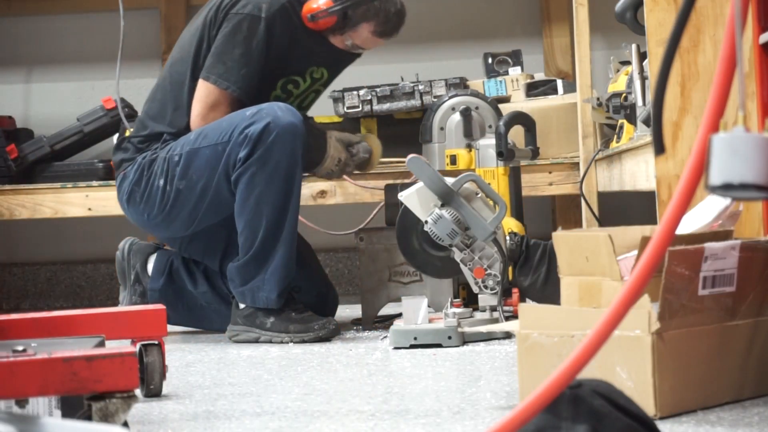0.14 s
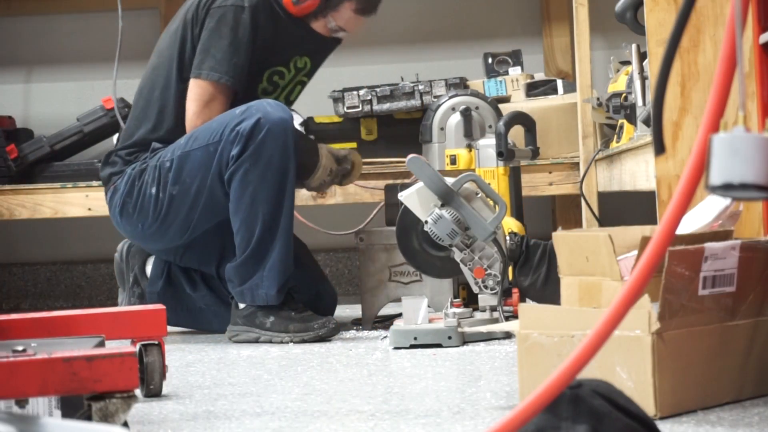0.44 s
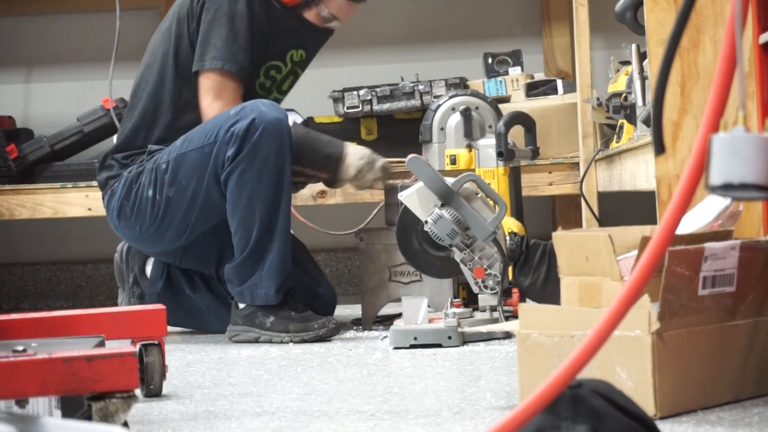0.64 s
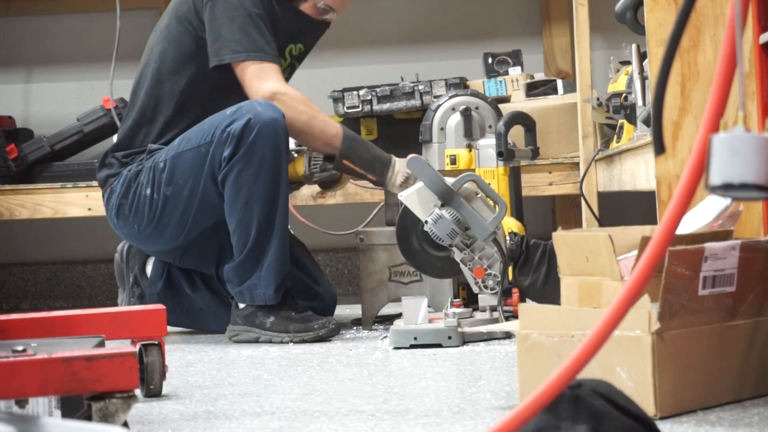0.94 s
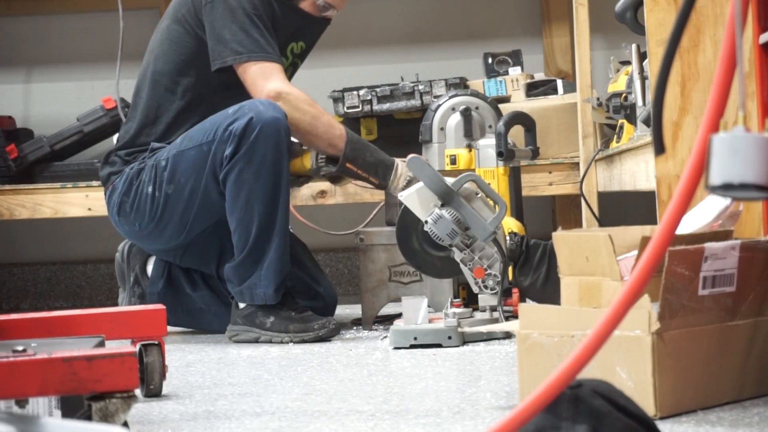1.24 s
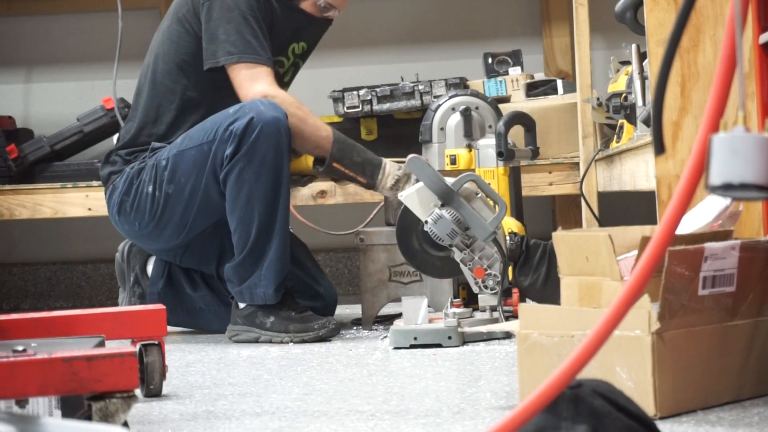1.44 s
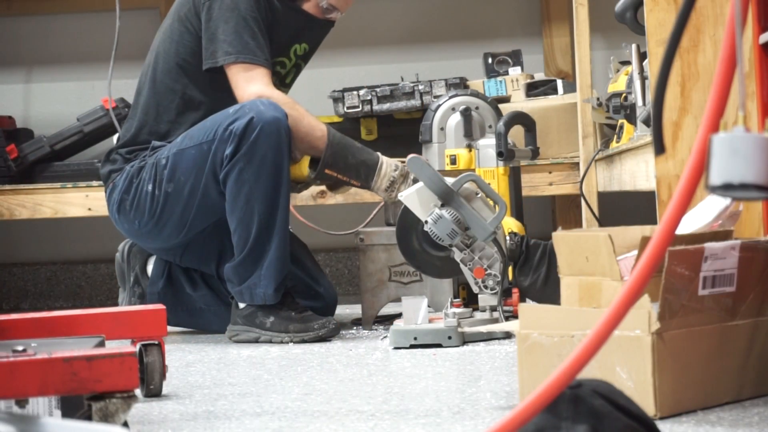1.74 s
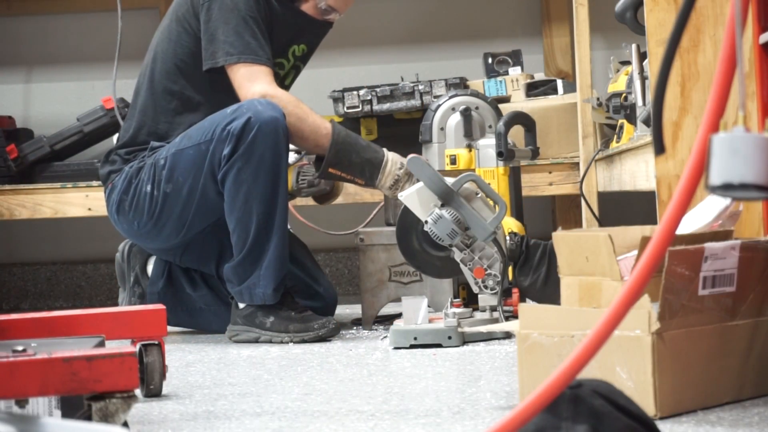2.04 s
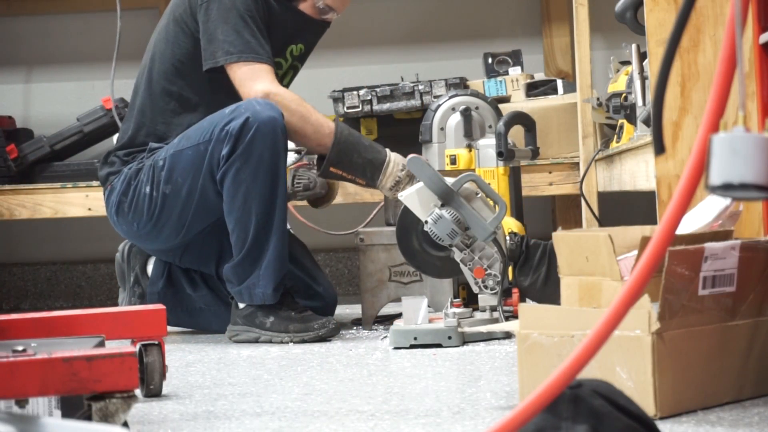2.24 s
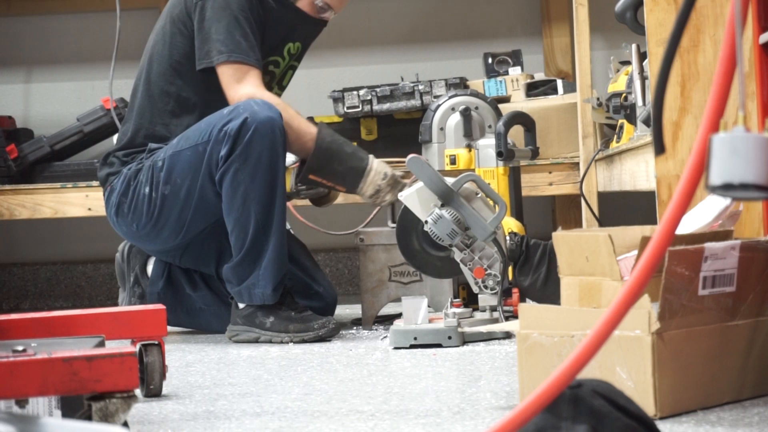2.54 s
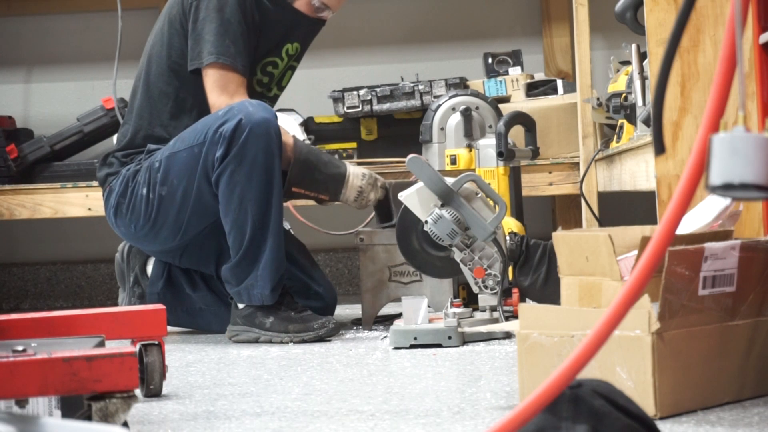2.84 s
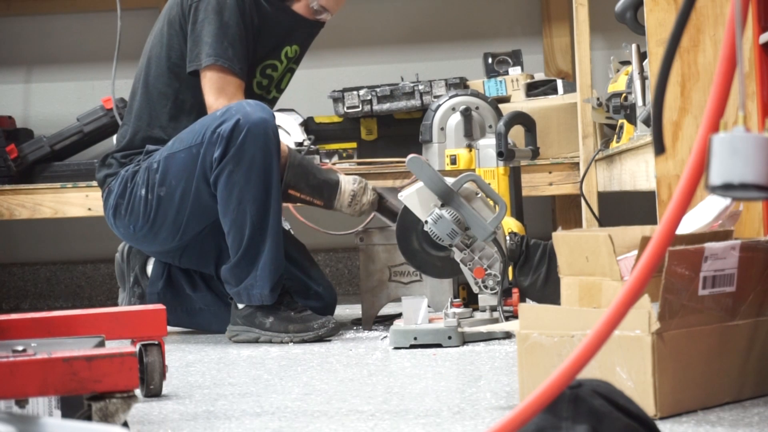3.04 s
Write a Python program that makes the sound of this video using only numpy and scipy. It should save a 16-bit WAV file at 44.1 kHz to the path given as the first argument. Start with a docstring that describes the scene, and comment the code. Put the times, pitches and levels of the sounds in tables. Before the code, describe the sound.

Chop saw coasting after power-off, its rushing motor and gear noise steadily fading as a faint hum drops in pitch; thin gritty scrapes and sharp ticks echo in the garage, caught by a small stereo camera microphone.

```python
"""Chop saw coasting down in a garage

The roar of a saw's motor, fan and gears gets softer and duller: shaped noise slides between two tone colours.
The armature whine is one sinking sine wave. A steel piece held lightly against the abrasive wheel scrapes in
uneven bursts: grit noise and sudden catches ring its modes, and a garage echo follows. A faint low rumble and
soft knocks on the floor lie underneath. All is heard in stereo through a small camera microphone."""
import sys
import numpy as np
from scipy import signal
from scipy.fft import rfft, irfft, next_fast_len
from scipy.io import wavfile
from scipy.ndimage import uniform_filter1d, map_coordinates

SR = 44100
rng = np.random.default_rng(int(sys.argv[2]) if len(sys.argv) > 2 else 0)


def undo_db(level):
    """Turn decibels back into plain size, where 20 dB means ten times bigger."""
    steps = np.asarray(level, float) / 20
    return 10 ** steps


def log_audio(samples):
    """Write samples as a 16-bit WAV file to the path given in sys.argv[1]."""
    # one column per channel
    frames = np.atleast_2d(samples).T
    # limit to full scale, then quantise
    limited = np.clip(frames, -1, 1)
    pcm = np.round(limited * 32767).astype(np.int16)
    wavfile.write(sys.argv[1], SR, pcm)


N = 141120
SECONDS = np.arange(N) / SR

# The saw slowing down. Each row: time in seconds, armature speed in Hz, whine level in dB before its flutter.
SPIN = [(0, 519, -70), (.4, 518.4, -57), (.7, 463, -56), (.85, 440, -51.5), (1.09, 412, -49),
        (1.5, 361.4, -49.5), (1.67, 346, -50.5), (1.74, 336.5, -69), (1.82, 334, -70), (1.9, 319.5, -60),
        (2.0, 315, -66), (2.1, 301, -75), (2.33, 282.4, -69.5), (2.45, 263, -79), (3.2, 205, -76)]
# Loudness of the roar. Each row: time in seconds, level in dB before roar() adds its gain.
ROAR_LEVEL = [(0.0, -26), (1.85, -33), (1.94, -32), (1.97, -34), (3.08, -38), (3.15, -36), (3.2, -34.5)]
# Tone colour of the roar at high speed. Each row: frequency in Hz, relative strength in dB per Hz.
FAST_COLOUR = [(76, -81), (156, -63), (186, -51.5), (391, -24.5), (508, -21.5), (608, -24), (1000, -8.5),
               (1350, -10), (2470, -4.5), (4000, -4), (7000, -9.5), (11600, -6.5), (15600, -12)]
# Tone colour of the roar at low speed. Each row: frequency in Hz, relative strength in dB per Hz.
SLOW_COLOUR = [(76, -65), (130, -43), (469, -11), (518, -11.5), (889, -9), (1020, -4), (1330, -8),
               (1440, -6), (3140, -0.5), (3760, -9), (4330, -3), (4780, -5), (7000, -10), (12000, -12.5),
               (15600, -15.5)]
# Resonances of guard and housing. Each row: frequency in Hz, width in Hz, boost in dB.
HOUSING = [(528.5, 29, 6.5), (645, 66, 6.5), (809, 43, 6.5), (1000, 160, 3), (1345, 71, -3),
           (1694, 124, 3.5), (2490, 69, 4), (3900, 420, 4), (3560, 510, 0.5), (5610, 480, 4)]
# How alike the roar is left and right. Each row: frequency in Hz, likeness (1 means the same).
ALIKE = [(30, .3), (90, 1), (200, 0.97), (400, 0.96), (700, 0.81), (1500, 0.59), (3000, 0.51), (6000, 0.16),
         (12000, 0.17)]
# The piece touching the wheel. Each row: time in seconds, relative contact pressure in dB,
# long ring of the whole piece against its thin edge in dB.
CONTACT = [(0.0, -38, -6), (0.05, -32.5, 2), (0.76, -35, -3.5), (0.8, -24.5, -2), (0.92, -33.5, -0.5),
           (1.23, -34, 1), (1.26, -26, 0.5), (1.32, -37, -6), (1.4, -29, -1.5), (1.54, -37, 1.5),
           (1.58, -29, 2), (1.59, -35.5, 1), (1.86, -37.5, -2), (1.88, -31.5, 3), (2.05, -31.5, -4),
           (2.16, -39, -4), (2.19, -39, 8), (2.22, -30, 2), (2.3, -39, 1), (2.38, -34, 0.5),
           (2.39, -31, -10), (2.41, -38, 0), (2.47, -48, -1), (2.49, -34, -1), (2.51, -38, 10),
           (2.55, -44, 5), (2.57, -30, -1), (2.61, -47, -7), (2.65, -34, 5.5), (2.77, -41, 4),
           (3.07, -40.5, 9), (3.14, -31.5, 4), (3.2, -32, 0)]
# The wheel catching the piece. Each row: time in seconds, relative strength in dB.
CATCHES = [(1.2323, -25), (1.3819, -26), (1.569, -21), (2.011, -25), (2.211, -31), (2.3345, -26),
           (2.3597, -27), (2.3805, -18), (2.4884, -21), (2.5575, -25.5), (2.6355, -33), (2.8052, -36),
           (3.127, -20), (3.1594, -32)]
# Modes of the thin edge. Each row: frequency in Hz, width in Hz, relative level in dB.
EDGE_MODES = [(11040, 480, -11.5), (11430, 250, 1), (11700, 560, 0.5), (12500, 200, -2.5),
              (12900, 400, -5.5)]
# Modes of the whole piece once the ring has climbed. Each row: frequency in Hz, width in Hz, relative level in dB.
BODY_MODES = [(2380, 1350, -15.5), (2870, 310, -10), (3225, 52, -9.5), (3720, 90, -8), (4194, 55, -1),
              (4286, 50, -2), (4316, 60, -1), (4534, 196, -7.5), (6270, 260, -16.5)]
# How long the garage rings. Each row: frequency in Hz, time to fall by 60 dB in seconds.
GARAGE_DECAY = [(300, 0.93), (4000, 1), (12000, 0.22)]
# Tone colour of the rumble. Each row: frequency in Hz, relative strength in dB per Hz.
RUMBLE_COLOUR = [(20, -5), (60, 5.5), (120, 6.5), (200, 14), (300, -23), (500, -60)]
# Soft knocks on the floor. Each row: start in seconds, level in dB, pitch in Hz, time to fall by 60 dB in seconds.
KNOCKS = [(.15, -73, 96, 0.33), (2.36, -66.5, 97.4, 0.84), (2.9, -62, 232, 0.86), (3.04, -63, 176, .4),
          (3.14, -62, 170.5, 0.43)]
# Balance of the two microphone ports. Each row: frequency in Hz, left over right in dB.
LEFT_OVER_RIGHT = [(30, 0), (200, 2.1), (1000, 0), (4000, 0.25), (12000, 1)]


def unit(x):
    """Scales a sound to an rms of 1."""
    return x / np.sqrt(np.mean(x ** 2) + 1e-20)


def along(points, hz):
    """Reads a curve of (Hz, value) points on a logarithmic frequency axis."""
    f, value = np.transpose(points)
    return np.interp(np.log(hz + 1), np.log(f + 1), value)


def curves(rows):
    """Turns each column after the time into one value per sample."""
    s, *columns = np.transpose(rows)
    return [np.interp(SECONDS, s, column) for column in columns]


def wobble(rate):
    """A smooth random curve through this many random points a second."""
    points = rng.standard_normal(int(N * rate / SR) + 4)
    return map_coordinates(points, [np.arange(N) * rate / SR])


def filtered(x, response):
    """Multiplies the spectrum of x by a response, given as a function of frequency."""
    m = next_fast_len(N + SR // 2)
    return irfft(rfft(x, m) * response(np.fft.rfftfreq(m, 1 / SR)), m)[..., :N]


def modes(table):
    """Response of a ringing body: a sum of resonances with alternating sign."""
    def response(f):
        total = 0
        for k, (centre, width, db) in enumerate(table):
            resonance = 1j * f * width / (centre ** 2 - f ** 2 + 1j * f * width)
            total = total + (-1) ** k * undo_db(db) * resonance
        return total
    return response


def roar():
    """Fan and gear noise through the housing and the room's standing waves; it dulls as the speed drops."""
    patchy_db, ripple_db, ripple_hz = 1.0, 1.6, 25
    fast_hz, slow_hz = 508, 213  # armature speeds of the two tone colours
    speed_hz, level_db = curves(SPIN)[0], curves(ROAR_LEVEL)[0]

    # Noise with patches of slightly uneven strength in time and frequency
    cells = signal.stft(rng.standard_normal((2, N)), nperseg=512)[2]
    patches = uniform_filter1d(rng.standard_normal(cells.shape[1:]), 6, 0)
    patches = uniform_filter1d(patches, 14, 1)
    noise = signal.istft(cells * undo_db(patchy_db * unit(patches)), nperseg=512)[1][:, :N]

    def housing(f):
        return undo_db(sum(db / (1 + (2 * (f - c) / w) ** 2) for c, w, db in HOUSING))

    def mid_side(f):
        # This angle shares the noise so that left and right are as alike as the table asks
        angle = np.arccos(np.clip(along(ALIKE, f), -1, 1)) / 2
        return housing(f) * [np.cos(angle), np.sin(angle)]

    mid, side = filtered(noise, mid_side)
    stereo = np.array([mid + side, mid - side])

    # Each colour has its own fine ripples from the standing waves
    knots = rng.standard_normal((2, SR))

    def coloured(colour, k):
        def response(f):
            ripple = ripple_db * map_coordinates(knots[k], [f / ripple_hz])
            return undo_db(along(colour, f) + ripple)
        return unit(filtered(stereo, response))

    fast, slow = coloured(FAST_COLOUR, 0), coloured(SLOW_COLOUR, 1)
    share = np.clip(np.log(speed_hz / slow_hz) / np.log(fast_hz / slow_hz), 0, 1)
    gain = undo_db(level_db + 6 + 0.067 * wobble(6.8))
    return gain * (share * fast + (1 - share) * slow)


def whine():
    """The unbalanced armature hums once a turn, slightly unsteady in pitch and level."""
    speed_hz, level_db = curves(SPIN)
    phase = 2 * np.pi * np.cumsum(speed_hz) / SR + 0.44 * wobble(30.9)
    return np.sqrt(2) * undo_db(level_db + 1.3 * wobble(17)) * np.sin(phase)


def grinding():
    """Grit hits of scattered size ring the steel piece; catches add a tick and a sudden shower of grit."""
    hits_per_s, spread_db = 3000, 4
    shower_db, shower_t60_s, tick_db = -8, 0.032, 9.5  # both levels are relative to the catch
    ring_rises, rise_s = 0.0414, 1.57  # share by which the ring climbs, and its rough duration
    pressure_db, ring_db = curves(CONTACT)

    # Scattered hits over a bed of smooth noise
    size = undo_db(spread_db * np.minimum(rng.exponential(size=N), 4)) * rng.standard_normal(N)
    hits = size * (rng.random(N) < hits_per_s / SR)
    grit = unit(hits) + 0.74 * rng.standard_normal(N)

    steady = undo_db(pressure_db - 4.5 + 0.52 * wobble(59.88))
    shower = 0
    for s, db in CATCHES:
        fall_db = 60 * np.abs(SECONDS - s) / shower_t60_s
        shower = shower + (SECONDS > s) * undo_db(db + shower_db - fall_db)
    tick_places = [round(s * SR) for s, db in CATCHES]
    tick = np.bincount(tick_places, [undo_db(db + tick_db) for s, db in CATCHES], N)

    edge, body = modes(EDGE_MODES), modes(BODY_MODES)
    thin = filtered(grit * (steady + shower) + tick, edge) / np.std(filtered(grit, edge))
    push = (grit * (steady + 0.77 * shower) + 0.46 * tick) * undo_db(ring_db)
    push = push / np.std(filtered(grit, body))

    # The ring climbs unevenly as the grip slides along the piece: lower modes fade into higher ones
    late = np.clip(SECONDS / rise_s + 0.3 * wobble(6.9), 0, 1)
    low_ring = filtered(push * np.sqrt(1 - late), lambda f: body(f * (1 + ring_rises)))
    high_ring = filtered(push * np.sqrt(late), body)
    # Cut the bass below 1500 Hz
    return filtered(thin + low_ring + high_ring, lambda f: 1 / (1 + (1500 / (f + 1)) ** 4))


def garage(x):
    """Echo of the garage: direct sound plus a fading noise tail that differs at each microphone port."""
    wet_db, delay = -0.5, 300  # delay in samples
    hz, t, cells = signal.stft(rng.standard_normal((2, SR // 2)), SR, nperseg=256)
    fade = undo_db(-60 * t / along(GARAGE_DECAY, hz)[:, None])
    tail = signal.istft(cells * fade, SR, nperseg=256)[1]
    tail = tail / np.linalg.norm(tail[0])
    wet = signal.fftconvolve(np.pad(x, (delay, 0))[None], tail, axes=1)[:, :N]
    return x + undo_db(wet_db) * wet


def rumble():
    """Faint low noise of uneven level, only partly alike at the two ports, that grows at the start."""
    start_db, rise_db, rise_s, uneven_db = -95, 15, 0.74, 5.5
    a, b = filtered(rng.standard_normal((2, N)), lambda f: undo_db(along(RUMBLE_COLOUR, f)))
    growth = np.minimum(SECONDS / rise_s, 1) ** 2
    level_db = start_db + rise_db * growth + uneven_db * wobble(4.6)
    return undo_db(level_db) * unit(np.array([a + 0.24 * b, a - 0.5 * b]))


def knocks():
    """Dull, soft-edged thuds: each is a wavering low ring with a shorter puff of low noise."""
    rise_s, puff_t60_s = 0.015, 0.27  # the puff's own fall comes on top of the ring's
    puff = unit(filtered(rng.standard_normal(N), lambda f: 1 / (1 + (f / 250) ** 4)))
    waver = 0.75 * wobble(20)
    total = 0
    for s, db, hz, t60 in KNOCKS:
        away = np.abs(SECONDS - s)
        envelope = np.clip((SECONDS - s) / rise_s, 0, 1) * undo_db(db - 60 * away / t60)
        ring = np.sin(2 * np.pi * hz * SECONDS + waver)
        total = total + envelope * (ring + 0.4 * puff * undo_db(-60 * away / puff_t60_s))
    return total


def scene():
    """Adds saw, steel piece, rumble and knocks, then tilts the balance between the microphone ports."""
    mix = roar() + whine() + garage(grinding()) + rumble() + knocks()
    sides = np.array([[1], [-1]])  # left gains what right loses
    return filtered(mix, lambda f: undo_db(along(LEFT_OVER_RIGHT, f) / 2 * sides))


def top_cut(x):
    """Nothing passes above the cut-off."""
    return signal.sosfilt(signal.butter(12, 17080, fs=SR, output="sos"), x)


def record(dry):
    """The camera keeps only what lies below its top frequency."""
    top_hz = 15750
    finished = filtered(dry, lambda f: f < top_hz)
    return top_cut(finished)


dry = scene()
out = record(dry)
log_audio(out)
```